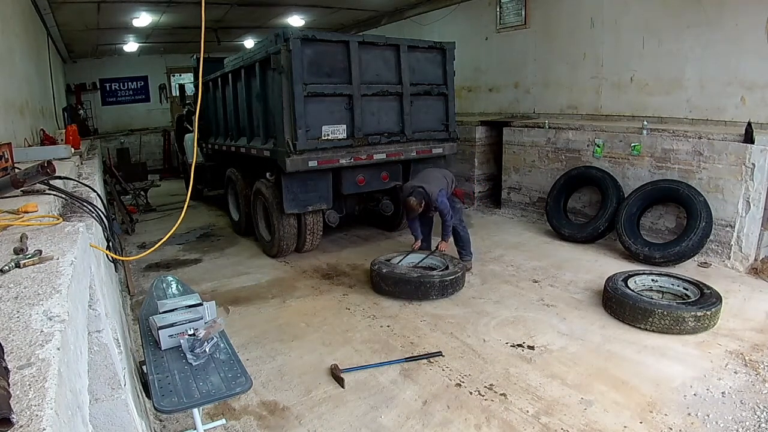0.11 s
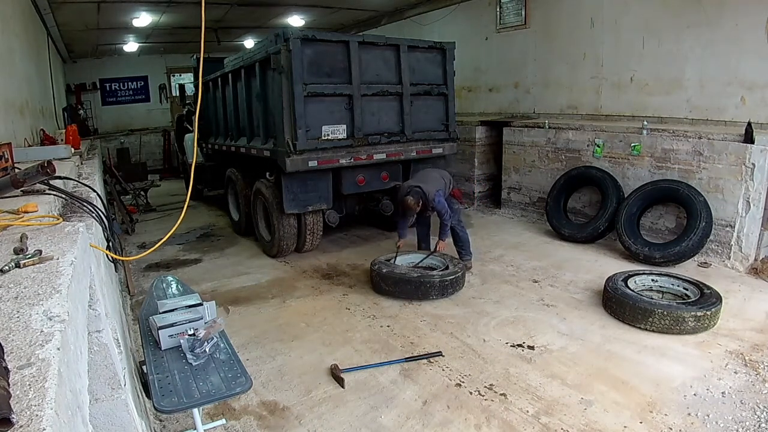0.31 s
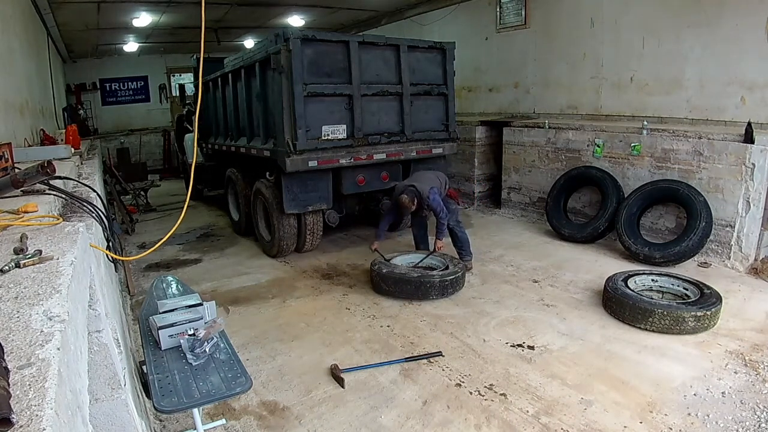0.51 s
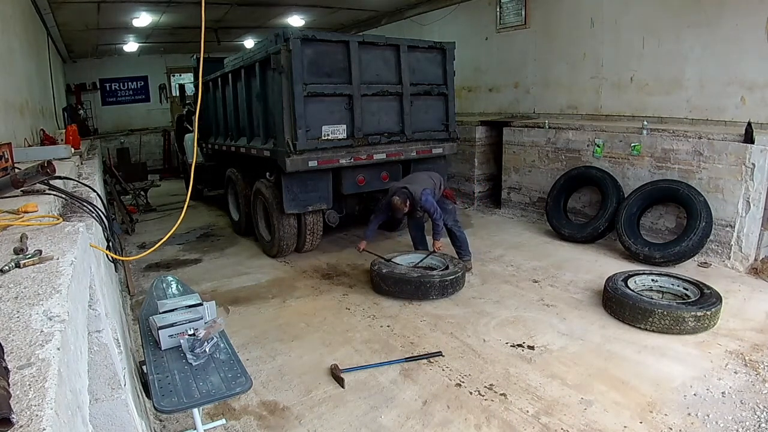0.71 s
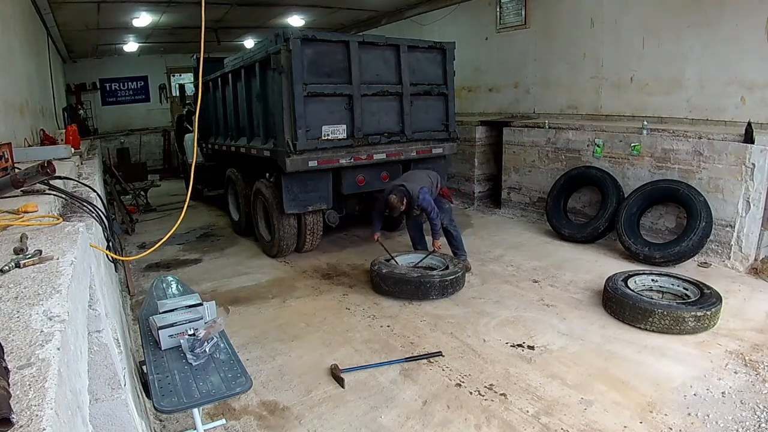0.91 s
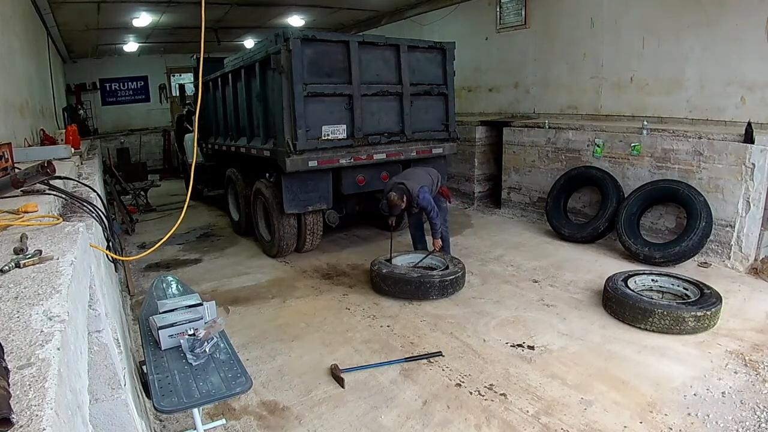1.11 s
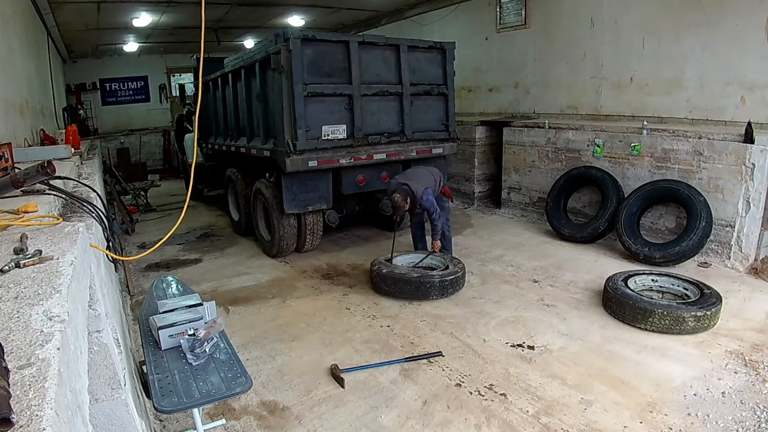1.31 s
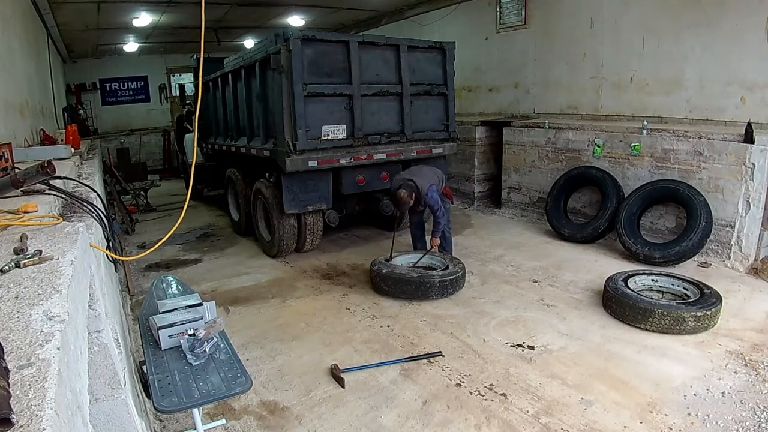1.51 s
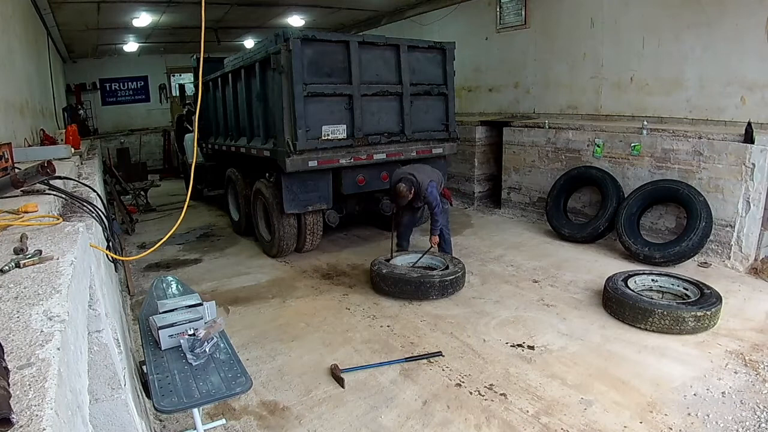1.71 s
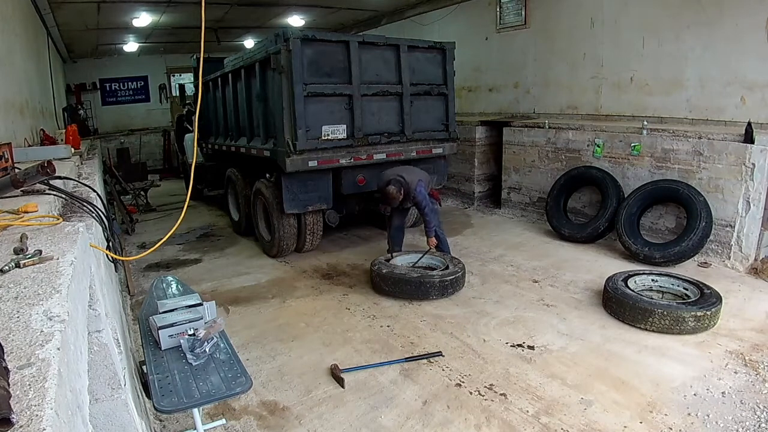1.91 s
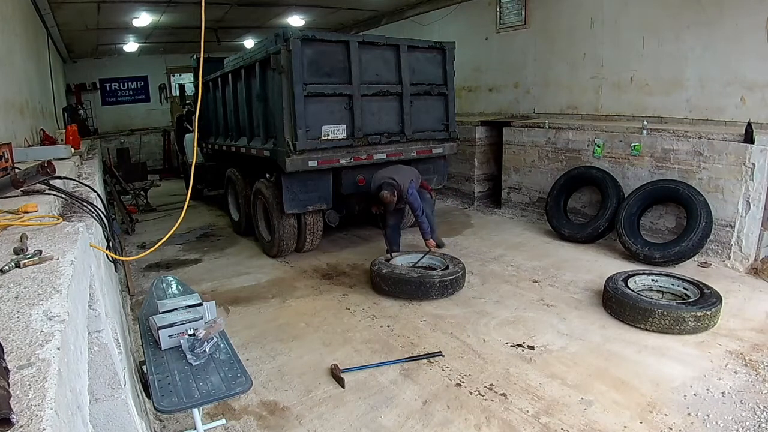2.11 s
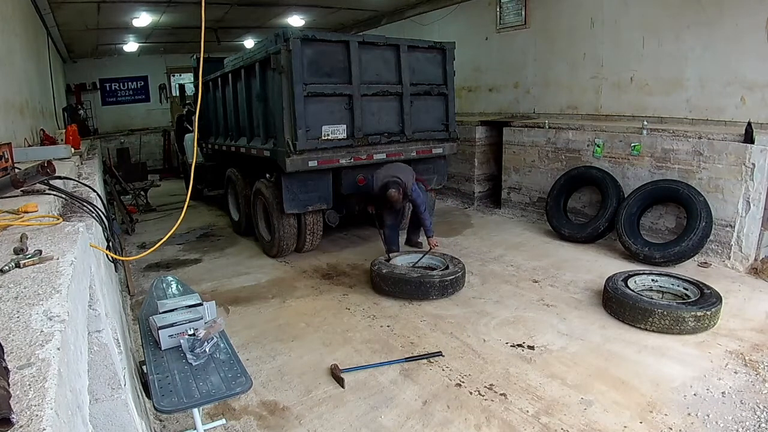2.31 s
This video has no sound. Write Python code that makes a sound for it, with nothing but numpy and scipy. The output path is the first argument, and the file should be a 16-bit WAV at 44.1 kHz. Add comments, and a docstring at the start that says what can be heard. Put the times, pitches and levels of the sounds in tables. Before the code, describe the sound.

Someone levers a truck tire over its rim with iron bars; sparse clanks, dull rubber thumps, brief scrapes and a thin squeak ring through a hard concrete garage over low rumble, picked up from across the room.

```python
"""Two steel irons knock on a truck wheel rim and on each other as they lever the tyre over it.
Knocks and some strong early reflections are noise cracks plus rim and iron modes; one iron squeals.
The bead thuds (noise thump, tyre modes) and scrapes (swelling runs of random slips).
A concrete bay answers with early echoes and a diffuse tail, over a low rumble of noise bands."""
import sys
import numpy as np
from scipy import signal
from scipy.io import wavfile

SR = 44100
rng = np.random.default_rng(int(sys.argv[2]) if len(sys.argv) > 2 else 0)


def log_audio(samples):
    """Write samples as a 16-bit WAV file to the path given in sys.argv[1]."""
    # one column per channel
    frames = np.atleast_2d(samples).T
    # limit to full scale, then quantise
    limited = np.clip(frames, -1, 1)
    pcm = np.round(limited * 32767).astype(np.int16)
    wavfile.write(sys.argv[1], SR, pcm)


N = 110250

# Steel knocks, some followed by a row for their strong early reflection:
# start_s, iron_name, rim_level_db, iron_level_db, ring_lowpass_hz,
# then crack_level_db (per half octave) at each of CRACK_POINT_HZ
KNOCKS = [ (.212, "holder", -41.5, -60, 3680, -51.5, -50.5, -44, -46.5, -64, -99, -85.5),
          (.247, "holder", -46.5, -70.5, 1350, -61, -53, -43.5, -73.5, -68.5, -100, -100),
          (0.291, "holder", -54, -67.5, 1750, -67.5, -55.5, -58, -62.5, -88.5, -100, -102),
          (.606, "lever", -62.5, -59.5, 1710, -54, -68.5, -62.5, -66.5, -72.5, -96, -108),
          (.809, "holder", -62.5, -60, 2390, -61, -68, -62, -79.5, -94, -102, -110),
          (.822, "holder", -63, -54.5, 725, -66.5, -62.5, -69.5, -79, -96, -104, -110),
          (1.081, "lever", -85, -59.5, 10000, -60.5, -65.5, -62.5, -70, -68.5, -88, -89),
          (1.094, "lever", -55.5, -49, 5820, -46.5, -59, -47.5, -58.5, -63, -96, -94.5),
          (1.108, "lever", -57, -46, 10000, -50.5, -55.5, -56.5, -62, -65.5, -93, -92),
          (1.974, "holder", -85, -52, 3620, -64, -81.5, -69, -70, -72, -102, -104),
          (1.986, "holder", -69.5, -53, 5960, -80, -75, -61, -80, -71, -100, -103)]
# Frequencies of the crack levels: point_hz
CRACK_POINT_HZ = [280, 600, 1100, 2100, 3900, 6000, 12000]
# Wheel rim modes: pitch_hz, level_db, t60_s
RIM_MODES = [(460.7, -9.5, 0.87), (536, -7.5, 0.2), (589.4, -4.5, 0.1), (689, -19.5, 0.13),
             (791, -16, 0.13), (855, -12.5, 0.12), (971.7, 0, 0.61), (1067.2, -4.5, 0.17),
             (1132.6, -4.5, 0.46), (1168, -1.5, 0.43), (1463, -14.5, 0.17), (1643, -11, 0.24),
             (1756, -10.5, 0.46), (2058, -11, 0.45), (2108, -11, 0.15), (2584, -32, .15),
             (3825, -24.5, 0.072)]
# Modes by iron, damped by hand and rubber; "lever" pries, "holder" holds the bead:
# pitch_hz, level_db, t60_s
IRON_MODES = { "lever": [(461.6, -1, .2), (1033.6, -5.5, 0.2), (1386, -6.5, 0.047), (1529, -9, 0.074),
              (1759, -15.5, 0.13), (2376, -25.5, 0.084), (2663, -16.5, 0.19), (2910, -17, .2),
              (3115, -19, 0.33), (3470, -19, 0.44), (3600, -25, .12), (3940, -31.5, 0.18),
              (4180, -20, 0.22), (4390, -23.5, 0.18), (4640, -20, 0.37), (4817, -24, .25),
              (5170, -26.5, 0.17), (5600, -36, .12), (5940, -23.5, 0.5), (6180, -35.5, 0.16),
              (7015, -31, 0.2), (7660, -42, .25), (8700, -43, .12)], "holder": [(581.5, -3.5, 0.14),
              (870.6, -6.5, 0.099), (1046.4, -6.5, .3), (1375.5, -5, 0.1), (1494, -9, 0.097),
              (2250, -17.5, 0.23), (2530, -16, .25), (2746, -16.5, 0.26), (3140, -24, 0.11),
              (3500, -29.5, 0.19), (4007, -33, 0.15), (4470, -25, 0.15), (4770, -31.5, .1)]}
# High modes of the slipping iron: pitch_hz, level_db, after_ring_t60_s
SQUEAL_MODES = [(1392, -57, .5), (2360, -64, .4), (3550, -73.5, .4), (3970, -60.5, 0.27), (4893, -60, 0.32),
                (5540, -77.5, .5), (5770, -75.5, 1.3), (6120, -85.5, .3), (7050, -75.5, .55),
                (9400, -92, .25)]
# Tyre thuds, levels ahead of the tyre band-pass: start_s, thump_level_db,
# then mode_level_db for each of TYRE_MODES
THUDS = [(0.209, -42, -47.5, -42.5, -51.5, -54.5), (0.553, -53, -58, -54.5, -56, -63.5),
         (.586, -53.5, -45, -50, -47, -60), (.724, -61, -59.5, -62, -58, -70.5),
         (1.094, -45.5, -46.5, -41.5, -42, -49), (1.134, -47.5, -67, -61, -44.5, -59.5),
         (2.3, -60, -50.5, -62, -57, -76), (2.39, -64, -56, -71, -70, -75),
         (2.441, -62, -56, -71, -60.5, -71.5)]
# Tyre modes: pitch_hz, t60_s
TYRE_MODES = [(101, 0.36), (134, 0.37), (176, 0.28), (306, 0.97)]
# Bead and iron scrapes: start_s, length_s, level_db, low_edge_hz, high_edge_hz
SCRAPES = [(0.546, .06, -50, 205, 394), (0.559, 0.075, -50, 890, 1470), (0.575, 0.038, -64.5, 2260, 4540),
           (0.93, 0.051, -76.5, 2850, 5050), (1.006, 0.1, -68, 2260, 5000), (0.937, 0.12, -57, 253, 1300),
           (1.809, 0.13, -58.5, 116, 760), (2.408, 0.074, -61.5, 283, 1160)]
# Hall reverberation: band_hz, t60_s
HALL_T60 = [(100, 0.68), (250, 0.86), (600, 1), (1200, 0.92), (2500, 0.93), (5000, 0.74), (10000, 0.52)]
# First echoes from floor, truck and walls, relative to direct sound: delay_s, level_db
ECHOES = [(.0032, 4.5), (0.014, 1.5), (0.018, 2.5), (.037, -12.5)]
# Room rumble per half octave: band_hz, level_db
RUMBLE = [(25, -79), (50, -71), (80, -65), (130, -62.5), (250, -69), (600, -75.5), (1200, -75.5),
          (2400, -84), (5000, -92), (8000, -99), (15000, -97.5)]

RING_TIME_S = np.arange(int(1.3 * SR)) / SR
RING_COUNT = len(RING_TIME_S)
BAND_EDGES_HZ = 22 * 2 ** (np.arange(20) / 2)  # half octaves
BAND_CENTRES_HZ = np.sqrt(BAND_EDGES_HZ[1:] * BAND_EDGES_HZ[:-1])

CRACK_T60_S, CHATTER_DECAY_S, CHATTER_DB = 0.13, 0.0031, -22.5
# Slightly uneven steel rings in close, beating pairs
PAIR_SPLIT_FRACTION, PAIR_DB = 0.0074, -4
# A blow takes a moment to spread through the body
RING_BUILD_S = 0.00082
# Direct sound relative to the hall's response
RING_DIRECT_DB, TYRE_DIRECT_DB = -5, 2
# Irons and rim shift against each other as they ring, which blurs their pitch
RIM_RATTLE_RAD, IRON_RATTLE_RAD, RATTLE_POINTS_PER_S = 0.65, 1.51, 110.4

SQUEAL_START_S, SQUEAL_RISE_S, SQUEAL_HOLD_S, SQUEAL_T60_S = 0.609, 0.0094, 0.069, 0.11
AFTER_RING_DB, SQUEAL_ROOM_DB = -5, -6.5
# Stick-slip unsteadiness of pitch, flutter of level
SQUEAL_JITTER_FRACTION, JITTER_POINTS_PER_S = 0.0031, 150
SQUEAL_FLUTTER_DB, FLUTTER_POINTS_PER_S = 3, 57

THUMP_LOW_HZ, THUMP_HIGH_HZ, THUMP_T60_S = 82.6, 268.4, 0.076
TYRE_LOW_HZ, TYRE_HIGH_HZ = 75, 830  # range the tyre radiates
SLIPS_PER_S, SLIP_SPREAD_DB, SCRAPE_SWELL_DB = 450, 4, 12.5
TAIL_DB, TAIL_BUILD_S = 4.5, 0.0018
RUMBLE_WAVER_DB, RUMBLE_POINTS_PER_S = 0.57, 16
CUTOFF_HZ = 15700


def amp(db):
    """Decibels to gain."""
    return 10 ** (np.asarray(db) / 20)


def at_hz(points, hz):
    """Interpolate a two-column table on a log-frequency axis."""
    point_hz, value = np.transpose(points)
    return np.interp(np.log(hz), np.log(point_hz), value)


def unit(x):
    """Scale to the energy of a tenth of a second at rms 1."""
    return x / np.sqrt(np.sum(x ** 2) * 10 / SR + 1e-20)


def add(out, start_s, x):
    """Mix a sound in at a time, cut at the end of the output."""
    i = int(start_s * SR)
    out[i:i + len(x)] += x[:max(len(out) - i, 0)]


def band(x, low_hz, high_hz, order=3):
    """Causal Butterworth band-pass."""
    sos = signal.butter(order, [low_hz, high_hz], "band", fs=SR, output="sos")
    return signal.sosfilt(sos, x)


def noise_bands(count):
    """Half-octave bands of noise, each rms 1, past the filters' start-up."""
    bands = []
    for low_hz, high_hz in zip(BAND_EDGES_HZ, BAND_EDGES_HZ[1:]):
        noise = rng.standard_normal(count + SR // 4)
        bands.append(band(noise, low_hz, high_hz)[-count:])
    bands = np.array(bands)
    return bands / bands.std(axis=1, keepdims=True)


def waver(count, points_per_s):
    """Random wander: straight lines between normal random points."""
    position = np.arange(count) / SR * points_per_s
    return np.interp(position, np.arange(400), rng.standard_normal(400))


def fade(t60_s):
    """Exponential decay, 60 dB in t60_s."""
    return np.exp(-np.log(1000) * RING_TIME_S / t60_s)


def through(x, response):
    """Convolve with a response, cut to the ring time."""
    return signal.fftconvolve(x, response)[:RING_COUNT]


def mode(pitch_hz, t60_s, room, rattle_rad=0, direct_db=RING_DIRECT_DB):
    """One struck mode and its fainter twin, blurred by any rattle, direct and through the hall."""
    phase = 2 * np.pi * pitch_hz * RING_TIME_S
    phase = phase + rattle_rad * waver(RING_COUNT, RATTLE_POINTS_PER_S)
    twin_ratio = 1 + PAIR_SPLIT_FRACTION * rng.choice([-1, 1])
    pair = np.sin(phase) + amp(PAIR_DB) * np.sin(phase * twin_ratio)
    build = 1 - np.exp(-RING_TIME_S / RING_BUILD_S)
    ring = rng.choice([-1, 1]) * pair * fade(t60_s) * build
    return unit(amp(direct_db) * unit(ring) + unit(through(ring, room)))


def struck_body(modes, room, rattle_rad):
    """A struck steel body rings as the sum of its modes."""
    return sum(amp(level_db) * mode(pitch_hz, t60_s, room, rattle_rad)
               for pitch_hz, level_db, t60_s in modes)


def knocks(room):
    """Knocks and strong early reflections: crack plus rim and iron ring, smeared by brief chatter."""
    out = np.zeros(N)
    rim = struck_body(RIM_MODES, room, RIM_RATTLE_RAD)
    irons = {name: struck_body(modes, room, IRON_RATTLE_RAD) for name, modes in IRON_MODES.items()}
    for start_s, iron_name, rim_db, iron_db, lowpass_hz, *crack_db in KNOCKS:
        chatter = rng.standard_normal(RING_COUNT) * np.exp(-RING_TIME_S / CHATTER_DECAY_S)
        ring = amp(rim_db) * rim + amp(iron_db) * irons[iron_name]
        ring = ring + amp(CHATTER_DB) * through(ring, chatter / np.linalg.norm(chatter))
        softening = signal.butter(6, lowpass_hz, fs=SR, output="sos")
        softened = signal.sosfilt(softening, ring)
        add(out, start_s, softened + crack(crack_db, room))
    return out


def crack(levels_db, room):
    """Noise bursts in quarter-octave bands, with a faint hiss at the top."""
    edges_hz = np.geomspace(CRACK_POINT_HZ[0], 16000, 24)
    log_centres = np.log(edges_hz[1:] * edges_hz[:-1]) / 2
    band_db = np.interp(log_centres, np.log(CRACK_POINT_HZ), levels_db)
    gains = amp(band_db) / np.sqrt(2)  # half-octave levels to quarter-octave bands
    bursts = [through(rng.standard_normal(RING_COUNT) * fade(CRACK_T60_S), room) for _ in range(2)]
    out = np.zeros(RING_COUNT)
    for k, gain in enumerate(gains):
        burst = bursts[k % 2]  # neighbouring bands use different noise
        out += gain * unit(band(burst, edges_hz[k], edges_hz[k + 1]))
    return out


def squeal(room):
    """Sliding steel sustains the iron's high modes briefly; they ring on faintly."""
    out = np.zeros(N)
    rise = np.minimum(RING_TIME_S / SQUEAL_RISE_S, 1)
    released_s = np.maximum(RING_TIME_S - SQUEAL_HOLD_S, 0)
    driven = np.exp(-np.log(1000) * released_s / SQUEAL_T60_S)
    for pitch_hz, level_db, t60_s in SQUEAL_MODES:
        envelope = rise * (driven + amp(AFTER_RING_DB) * fade(t60_s))
        jitter = 1 + SQUEAL_JITTER_FRACTION * waver(RING_COUNT, JITTER_POINTS_PER_S)
        phase = 2 * np.pi * np.cumsum(pitch_hz * jitter) / SR
        flutter = amp(SQUEAL_FLUTTER_DB * waver(RING_COUNT, FLUTTER_POINTS_PER_S))
        tone = unit(np.sin(phase) * envelope * flutter)
        heard = tone + amp(SQUEAL_ROOM_DB) * unit(through(tone, room))
        add(out, SQUEAL_START_S, amp(level_db) * unit(heard))
    return out


def thuds(room):
    """The bead jumps: a dull noise thump and the tyre's low modes."""
    out = np.zeros(N)
    modes = np.array([mode(pitch_hz, t60_s, room, direct_db=TYRE_DIRECT_DB)
                      for pitch_hz, t60_s in TYRE_MODES])
    for start_s, thump_db, *mode_db in THUDS:
        burst = rng.standard_normal(RING_COUNT) * fade(THUMP_T60_S)
        thump = band(burst, THUMP_LOW_HZ, THUMP_HIGH_HZ)
        add(out, start_s, amp(thump_db) * unit(through(thump, room)) + amp(mode_db) @ modes)
    return band(out, TYRE_LOW_HZ, TYRE_HIGH_HZ, order=4)


def scrapes(room):
    """Runs of tiny random slips that grow as the lever is loaded, until they let go."""
    out = np.zeros(N)
    for start_s, length_s, level_db, low_hz, high_hz in SCRAPES:
        slipping = rng.random(RING_COUNT) < SLIPS_PER_S / SR
        sign = np.sign(rng.standard_normal(RING_COUNT))
        size = amp(SLIP_SPREAD_DB * rng.standard_normal(RING_COUNT))
        swell = amp(SCRAPE_SWELL_DB * np.minimum(RING_TIME_S / length_s, 1))
        slips = slipping * sign * size * swell * (RING_TIME_S < length_s)
        add(out, start_s, amp(level_db) * unit(band(through(slips, room), low_hz, high_hz)))
    return out


def hall():
    """Impulse response of energy 1: direct sound, first echoes, diffuse tail with faster treble decay."""
    tail = np.zeros(RING_COUNT)
    for noise, hz in zip(noise_bands(RING_COUNT), BAND_CENTRES_HZ):
        tail += noise * np.sqrt(hz) * fade(at_hz(HALL_T60, hz))  # sqrt(hz): white at the start
    tail = tail * (1 - np.exp(-RING_TIME_S / TAIL_BUILD_S))
    response = amp(TAIL_DB) * tail / np.linalg.norm(tail)
    response[0] += 1
    for delay_s, level_db in ECHOES:
        response[int(delay_s * SR)] += amp(level_db)
    return response / np.linalg.norm(response)


def rumble():
    """The bay's low background: noise bands, each wavering slightly in level."""
    out = np.zeros(N)
    for noise, hz in zip(noise_bands(N), BAND_CENTRES_HZ):
        level_db = at_hz(RUMBLE, hz) + RUMBLE_WAVER_DB * waver(N, RUMBLE_POINTS_PER_S)
        out += noise * amp(level_db)
    return out


def scene():
    """All wheel work shares one hall response; rumble is added as is."""
    room = hall()
    work = knocks(room) + squeal(room) + thuds(room) + scrapes(room)
    return (work + rumble())[None]


def record(dry):
    """Steep elliptic low-pass."""
    lowpass = signal.ellip(10, 0.1, 70, CUTOFF_HZ, fs=SR, output="sos")  # ripple, stopband in dB
    return signal.sosfilt(lowpass, dry)


dry = scene()
out = record(dry)
log_audio(out)
```